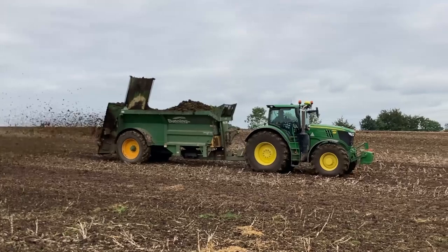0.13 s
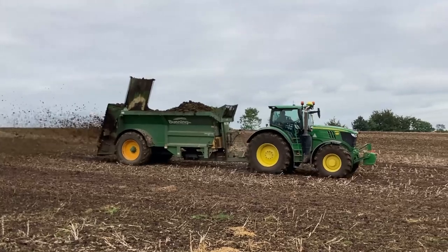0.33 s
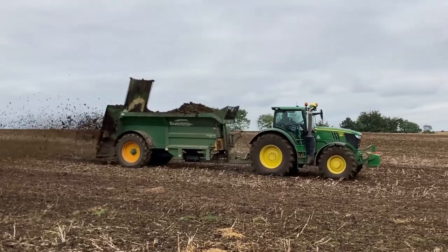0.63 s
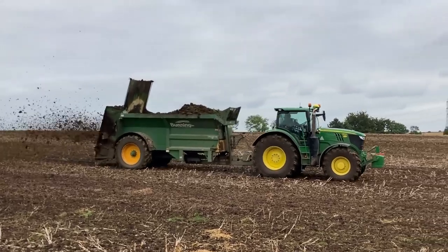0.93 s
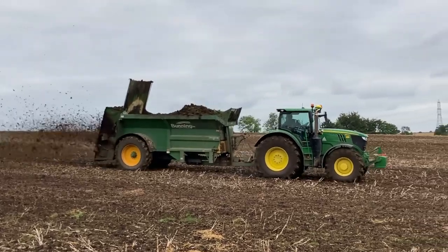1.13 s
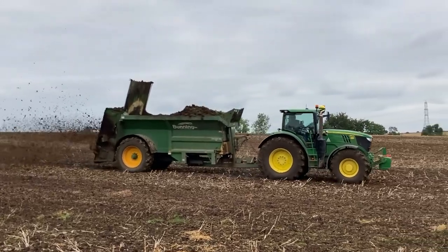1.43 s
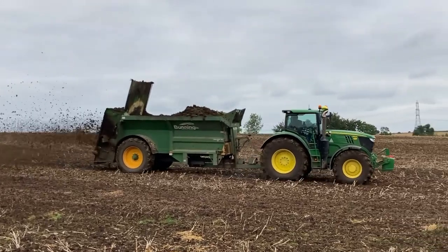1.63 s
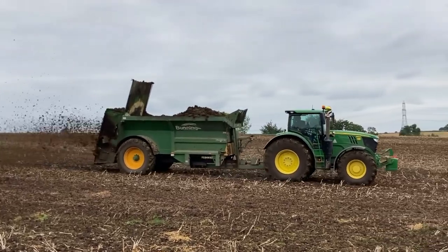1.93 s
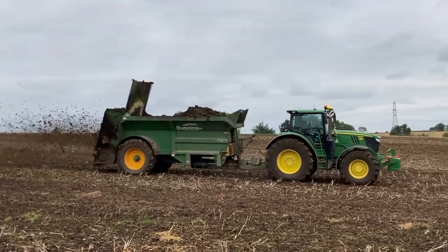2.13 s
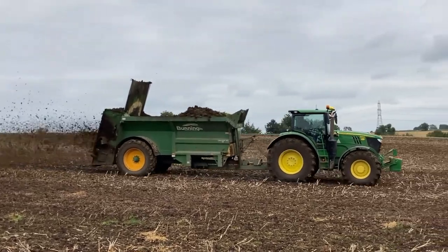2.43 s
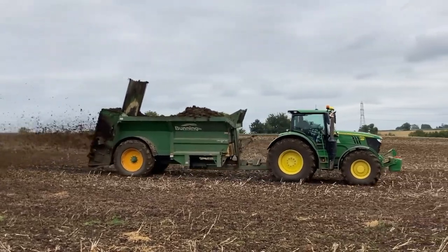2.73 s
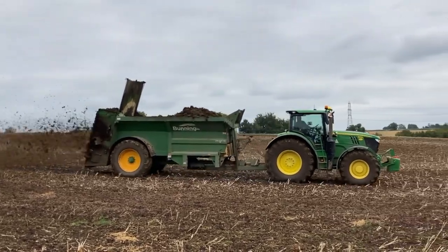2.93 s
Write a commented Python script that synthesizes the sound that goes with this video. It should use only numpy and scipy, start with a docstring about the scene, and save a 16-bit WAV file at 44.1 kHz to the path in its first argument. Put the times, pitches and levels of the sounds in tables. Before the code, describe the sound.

A manure spreader towed by a tractor runs throughout, about 3 seconds: bass-heavy engine and fan roar with slightly swelling hiss, and a wavering gear whine near 1350 Hz. Dull, irregular beater thumps around 110 Hz crowd the first half second, with strong blows near 0.3, 1.3, 1.9, 2.15 and 2.7. Hollow steel rattles accompany several; sharp grit ticks scatter, denser after 2.4. Open field, dry wide stereo.

```python
"""Across an open field, some way off, a tractor pulls a manure spreader.
Engine and fan roar as shaped noise; gears whine above it as wandering tones, part clean, part fuzzy.
Beaters thump into the load as short wave packets and rattle the steel box, a bank of noise-fed resonances.
Flung grit ticks off the blades as sharp cracks that ring their modes.
Two spaced microphone ports hear it, partly alike, with scattered sound that differs between them."""
import sys
import numpy as np
from scipy import signal
from scipy.fft import rfft, irfft
from scipy.io import wavfile
from scipy.ndimage import uniform_filter1d

SR = 44100
rng = np.random.default_rng(int(sys.argv[2]) if len(sys.argv) > 2 else 0)


def unload_audio(sound):
    """Save the sound as a 16-bit wav file, at the path given as the first command line argument."""
    columns = np.transpose(np.atleast_2d(sound))
    # keep every value between -1 and 1, then stretch to whole-number steps
    steps = np.round(np.clip(columns, -1, 1) * 32767)
    wavfile.write(sys.argv[1], SR, steps.astype(np.int16))


N = 136269  # samples

# Engine and fan roar, spectral shape: f/Hz, relative density level/dB
ROAR_SPECTRUM = [(30, -104), (55, -37.5), (110, -50.5), (170, -57), (250, -61.5), (330, -59), (480, -58.5),
                 (750, -55), (1000, -57.5), (1500, -63), (2100, -67), (3200, -72.5), (4500, -74.5),
                 (6000, -81), (8000, -79), (11000, -82), (15500, -92)]
# Swells of the treble: t/s, level change/dB
TREBLE_SWELLS = [(0, 3.5), (.65, 1.5), (1.5, 3.5), (3.09, 5)]
# Whines of the main, second and third gear pairs: t/s, f/Hz, RMS level/dB
MAIN_WHINE = [(0, 1326, -33), (.12, 1335, -30), (.15, 1335, -44), (.19, 1354, -32.5), (.8, 1355, -38),
              (.85, 1368, -30.5), (1.22, 1361, -31.5), (1.36, 1353, -29.5), (1.41, 1360, -41),
              (1.62, 1334, -30.5), (1.85, 1360, -31.5), (1.89, 1347, -25.5), (2.05, 1363, -30),
              (2.4, 1361, -33.5), (2.46, 1340, -36.5), (2.51, 1349, -32.5), (2.59, 1362, -28),
              (2.63, 1345, -46), (2.71, 1349, -28.5), (3.09, 1371, -32)]
LOW_WHINE = [(0, 1137, -49), (1.75, 1132, -36.5), (2.4, 1138, -41), (3.09, 1153, -39)]
HIGH_WHINE = [(0, 1661, -42), (.7, 1677, -47), (1.0, 1692, -41.5), (1.55, 1675, -42), (3.09, 1674, -51.5)]
# Faint fuzzy gear lines: f/Hz, bandwidth/Hz, initial RMS level/dB
FAINT_LINES = [(401, 16, -40), (1910, 24, -44), (1997, 21, -45), (3775, 55, -48.5)]
# Course of the lighter thumps: t/s, RMS level/dB
SMALL_LEVEL = [(0, -28.5), (1.2, -22), (2.1, -24.5), (2.75, -25), (3.09, -21.5)]
# Beater blows: t/s of the peak, level/dB, f/Hz, width/s
THUMPS = [(0.004, -4, 102, 0.011), (0.147, -8.0, 122, 0.016), (0.193, -9.5, 123, 0.015),
          (0.233, -9.5, 109.0, 0.015), (0.268, -8.5, 111, 0.01), (0.299, -3, 105.0, 0.0079),
          (0.372, -9.5, 104, 0.011), (0.422, -9.5, 137.5, 0.017), (0.443, -10.5, 92, 0.019),
          (0.522, -14, 112, 0.043), (0.598, -13, 108.0, 0.0067), (0.66, -12.5, 115, 0.015),
          (0.731, -13, 107, 0.039), (1.008, -12, 132, 0.014), (1.051, -11.5, 123.0, 0.01),
          (1.282, -8.5, 130.8, 0.008), (1.295, -2.0, 116.0, 0.011), (1.377, -13.5, 94, 0.014),
          (1.519, -8.5, 104.0, 0.012), (1.574, -13, 106.3, 0.017), (1.75, -10.5, 103, 0.023),
          (1.85, -7.5, 96.4, 0.023), (1.873, -3.0, 104, 0.013), (2.095, -13.5, 130, 0.025),
          (2.153, -2.5, 118, 0.02), (2.243, -14.5, 100, 0.008), (2.381, -13.5, 112.7, 0.018),
          (2.438, -6.5, 120, 0.024), (2.712, -4, 120.3, 0.009), (2.73, -5, 114.0, 0.008),
          (2.882, -11.5, 104, 0.014), (3.022, -8.5, 86.4, 0.028), (3.068, -13.5, 215, 0.01),
          (3.084, -10.5, 103, 0.011)]
# Modes of the steel box: f/Hz, bandwidth/Hz of the first pass, relative level/dB
BOX_MODES = [(314.4, 106, 2.5), (653, 73.8, 5), (881, 79, 1), (1580, 320, -14)]
# Blows that also rattle the box: t/s, level/dB, brightness/(dB per octave)
RATTLES = [(.425, -11, -4), (0.711, -15, 2.5), (1.28, -6, -2.9), (1.568, -5.5, -2.5), (1.853, -6.5, 0),
           (1.888, -7, 9), (2.146, -3.5, 3.5), (2.425, -10, -0.5), (2.57, -12, 4.5), (2.71, -3.5, 4),
           (2.999, -3.5, 1.8), (3.062, -17.5, -12)]
# Grit on steel: t/s, level/dB of the crack, centre f/Hz
TICKS = [(0.0532, -10.5, 7150), (0.0877, -14, 7000), (0.4875, -11, 7600), (0.889, -7.5, 9800),
         (1.0302, -11, 10500), (1.346, -16, 7500), (1.629, -16.5, 6290), (1.7471, -8, 11500),
         (2.009, -14.5, 5680), (2.0332, -16, 6540), (2.0926, -17.5, 6200), (2.4188, -13, 7460),
         (2.437, -15, 7330), (2.483, -9, 7460), (2.4908, -13.5, 3300), (2.6058, -5.5, 12500),
         (2.707, -4, 7630), (2.7815, -14.5, 6700), (2.8678, -15, 8020), (2.9921, -13, 7600)]
# Modes of the blades: f/Hz, relative level/dB
BLADE_MODES = [(3400, -2.5), (5100, -11), (7800, -17.5), (10500, -18)]
# Likeness of the two ports: f/Hz, shared power fraction/(0-1)
LIKENESS = [(120, .8), (700, .7), (1200, .78), (2200, .5), (3800, .3), (4800, .62), (6400, .35), (7000, .8),
            (15500, .8)]
# Phase of the right port: f/Hz, phase/rad
RIGHT_PHASE = [(0, 0), (1700, -.9), (2240, -.5), (3300, -1.8), (3800, -3.9), (4900, -4.6), (5900, -2.6),
               (6500, -5.9), (6900, -5.9), (9100, -3.14), (15700, 6.2)]
# Left port over right: f/Hz, level/dB
PORT_TILT = [(600, -0.66), (2750, 3.5), (4300, 0.5), (6000, 1.5), (7200, -0.3)]

ROAR_DB = -25  # RMS over the three strands
TREBLE_FROM_HZ, FLICKER_DB = 4100, 1.8  # flicker is the RMS swing far above this frequency
FAINT_FADE_DB_PER_S = -2.5
SMALL_PER_S, SMALL_SPREAD_DB, SMALL_HZ, SMALL_S = 130, 2.5, 106, 0.0083  # median pitch and width
RATTLE_S, BOX_HUM_DB = 0.022, -24.5  # the box also rings on faintly from the drive
TICK_CYCLES, RING_S = 0.61, 0.0013  # ring decays to 1/e in RING_S
GRIT_PER_S, GRIT_DB, GRIT_SPREAD_DB = 350, -43, 4.5  # the fine patter, RMS level
FIELD_T60_S = 0.047
BLOW_ECHO_DB, GEAR_ECHO_DB, TICK_ECHO_DB = -6, -9, -15.5  # scattered relative to direct
GEAR_TURN = 0.41  # share of the port phase: gears sit nearer the middle than the rest
LOW_CUT_HZ, SHELF_HZ, EDGE_HZ, EDGE_DB = 23.3, 15750, 16500, -22


def amp(db):
    """The decibel law: amplitude ratio from level."""
    return 10 ** (np.asarray(db) / 20)


def evened(x):
    """Power normalization: the RMS value becomes 1."""
    return x / np.sqrt(np.mean(x ** 2) + 1e-20)


def read(points, hz):
    """Interpolation of a spectrum on a logarithmic frequency axis."""
    f, value = np.transpose(points)
    return np.interp(np.log(hz + 1), np.log(f + 1), value)


def add(mix, s, sound):
    """Linear superposition: adds a sound whose middle falls at s."""
    start = round(s * SR) - len(sound) // 2
    part = mix[max(start, 0):][:len(sound) + min(start, 0)]
    part += sound[max(-start, 0):][:len(part)]


def resonate(x, hz, width):
    """Resonance by heterodyning: shift hz to zero, low-pass with peak gain 1, shift back."""
    turn = np.exp(2j * np.pi * np.cumsum(hz * np.ones(len(x))) / SR)
    r = np.exp(-np.pi * width / SR)
    baseband = signal.lfilter([1 - r], [1, -r], x / turn + 1e-18)
    return 2 * (turn * baseband).real


def wavelet(hz, width_s, phase):
    """Wave packet: a cosine, its phase in cycles, under a Gaussian envelope."""
    t = np.arange(-2 * width_s, 2 * width_s, 1 / SR)
    return np.exp(-2 * (t / width_s) ** 2) * np.cos(2 * np.pi * (hz * t + phase))


def scatter(per_s, spread_db, shapes):
    """Shot noise: random impacts of uneven size, each with one of the shapes."""
    size = amp(spread_db * np.minimum(rng.exponential(1, N), 3))
    impacts = size * (rng.random(N) < per_s / SR)
    which = rng.integers(0, len(shapes), N)
    return evened(sum(signal.oaconvolve(impacts * (which == k), shape, "same")
                      for k, shape in enumerate(shapes)))


def roar():
    """Broadband noise by spectral shaping: shared, left and right strands, drifting and flickering."""
    hop, size = 128, 512
    frames, hz = N // hop + 5, np.fft.rfftfreq(size, 1 / SR)
    z = rng.standard_normal((frames, len(hz), 7)).T
    patches = evened(uniform_filter1d(uniform_filter1d(z[6], 8, 0), 16, 1))  # over frequency, then time
    flicker = evened(uniform_filter1d(rng.standard_normal(frames), 4))
    treble = (hz ** 2 / (hz ** 2 + TREBLE_FROM_HZ ** 2))[:, None]
    swell_db = np.interp(np.arange(frames) * hop / SR, *np.transpose(TREBLE_SWELLS))
    level_db = 1.4 * patches + treble * (swell_db + FLICKER_DB * flicker)
    spectra = (z[:3] + 1j * z[3:6]) * amp(level_db)
    x = signal.istft(spectra, nperseg=size, noverlap=size - hop)[1][:, :N]
    shape = amp(read(ROAR_SPECTRUM, np.fft.rfftfreq(N, 1 / SR)))
    return amp(ROAR_DB) * evened(irfft(rfft(x) * shape, N))


def whine(curve, rough, wander_hz):
    """Frequency modulation: a gear tone wanders (RMS in Hz); rough is its narrow-band noise power share."""
    s, hz, db = np.transpose(curve)
    t = np.arange(N) / SR
    wander = evened(uniform_filter1d(uniform_filter1d(rng.standard_normal(N), 1500), 1500))
    hz = np.interp(t, s, hz) + wander_hz * wander
    clean = np.sqrt(2) * np.sin(2 * np.pi * (np.cumsum(hz) / SR + rng.random()))
    fuzz = evened(resonate(resonate(rng.standard_normal(N), hz, 67), hz, 67))
    rough = np.clip(rough, 0, 1)
    return amp(np.interp(t, s, db)) * (np.sqrt(1 - rough) * clean + np.sqrt(rough) * fuzz)


def gears():
    """Superposition of line spectra: three clear whines and a few faint fuzzy lines that fade."""
    faint = sum(amp(db) * evened(resonate(rng.standard_normal(N), hz, width))
                for hz, width, db in FAINT_LINES)
    fade = amp(FAINT_FADE_DB_PER_S * np.arange(N) / SR)
    return (whine(MAIN_WHINE, rough=0.24, wander_hz=5.42)
            + whine(LOW_WHINE, rough=0.37, wander_hz=5.27)
            + whine(HIGH_WHINE, rough=0.3, wander_hz=6.63) + faint * fade)


def small_thumps():
    """Shot noise of low wave packets between the blows: shared, left and right strands."""
    shapes = [wavelet(SMALL_HZ * np.exp(0.22 * a), SMALL_S * np.exp(0.049 * b), phase)
              for a, b, phase in rng.standard_normal((16, 3))]
    level = amp(np.interp(np.arange(N) / SR, *np.transpose(SMALL_LEVEL)))
    return level * np.array([scatter(SMALL_PER_S, SMALL_SPREAD_DB, shapes) for _ in range(3)])


def beaters():
    """Impact excitation: blows make dull wave packets, and bursts of noise drive the box resonances."""
    blows, noise = np.zeros(N), rng.standard_normal(N)
    for (s, db, hz, width), phase in zip(THUMPS, rng.random((len(THUMPS), 1))):
        add(blows, s, amp(db) * wavelet(hz, width, phase))
    for hz, width, mode_db in BOX_MODES:
        shake = np.full(N, amp(BOX_HUM_DB + mode_db))
        for s, db, bright in RATTLES:
            bright_db = bright * np.log2(hz / BOX_MODES[1][0])  # pivots on the second mode
            add(shake, s, amp(db + mode_db + bright_db) * wavelet(0, RATTLE_S, 0))
        blows = blows + resonate(resonate(shake * noise, hz, width), hz, 2 * width)
    return blows


def tick(hz, phase):
    """Modal excitation: a sharp crack around hz briefly rings mainly the nearest modes of a blade."""
    t = np.arange(-5 * RING_S, 5 * RING_S, 1 / SR)
    ring = sum(amp(db) * np.exp(-2 * np.log(f / hz) ** 2) * np.sin(2 * np.pi * f * t)
               for f, db in BLADE_MODES)
    out = ring * np.exp(-abs(t) / RING_S) * (t > 0)
    add(out, 5 * RING_S, wavelet(hz, TICK_CYCLES / hz, phase))
    return out


def grit():
    """Superposed impacts: separate loud ticks over a shot-noise patter of smaller ones."""
    loud = np.zeros(N)
    for (s, db, hz), phase in zip(TICKS, rng.random((len(TICKS), 1))):
        add(loud, s, amp(db) * tick(hz, phase))
    shapes = [tick(hz, rng.random()) for hz in np.geomspace(2500, 11000, 16)]
    return amp(GRIT_DB) * scatter(GRIT_PER_S, GRIT_SPREAD_DB, shapes) + loud


def field(x):
    """Scattering off ground and machine: sparse decaying taps of random sign, different for each port."""
    taps = np.zeros((2, 8000))
    at = np.arange(40, 7960, 20) + rng.integers(0, 20, (2, 396))
    decay = amp(-60 * at / SR / FIELD_T60_S)
    np.put_along_axis(taps, at, rng.choice([-1., 1.], at.shape) * decay, 1)
    return signal.fftconvolve(x[None], taps / np.linalg.norm(taps[0]), axes=1)[:, :N]


def scene():
    """Partial coherence: direct sound reaches both ports, the right turned in phase; scatter differs."""
    blows, ticks, noise = beaters(), grit(), roar() + small_thumps()
    hz = np.fft.rfftfreq(N, 1 / SR)
    same = np.clip(read(LIKENESS, hz), 0, 1)
    right_turn = np.exp(1j * np.interp(hz, *np.transpose(RIGHT_PHASE)))
    turn = np.array([np.ones(len(hz)), right_turn])
    scattered = noise[1:] + amp(BLOW_ECHO_DB) * field(blows)
    both = np.sqrt(same) * turn * rfft(blows + noise[0]) + np.sqrt(1 - same) * rfft(scattered)
    tones = gears()
    both += turn ** GEAR_TURN * rfft(tones + amp(GEAR_ECHO_DB) * field(tones))
    both += turn * rfft(ticks) + amp(TICK_ECHO_DB) * rfft(field(ticks))
    tilt = amp(np.outer([.5, -.5], read(PORT_TILT, hz)))  # half up on the left, half down on the right
    return irfft(both * tilt, N)


def record(dry):
    """Band limitation: a low cut, then a steep step down in the treble, a further slope, then nothing."""
    low_cut = signal.butter(2, LOW_CUT_HZ, "high", fs=SR, output="sos")
    dry = signal.sosfilt(low_cut, dry)
    corners_hz = [0, SHELF_HZ - 60, SHELF_HZ + 60, EDGE_HZ - 200, EDGE_HZ, SR / 2]
    gains = [1, 1, amp(EDGE_DB), amp(2 * EDGE_DB), 0, 0]
    taps = signal.firwin2(1023, corners_hz, gains, window=("kaiser", 9), fs=SR)
    return signal.oaconvolve(dry, taps[None], "same")


dry = scene()
out = record(dry)
unload_audio(out)
```